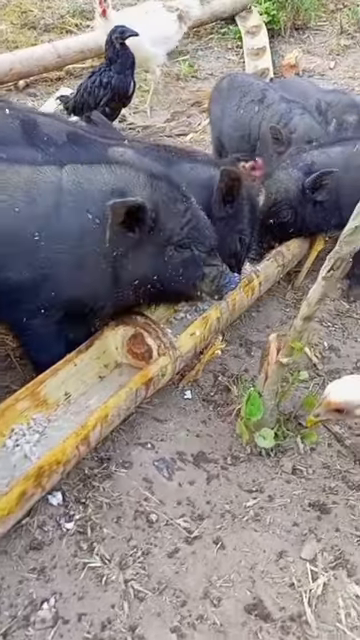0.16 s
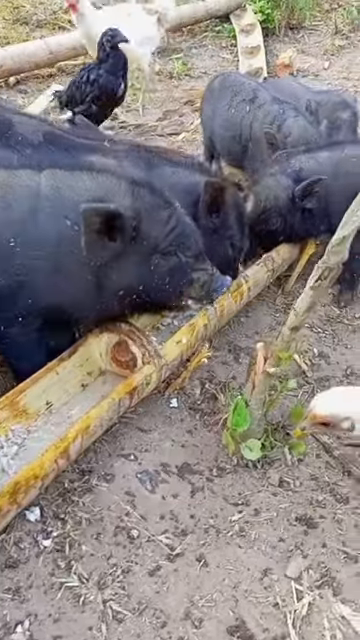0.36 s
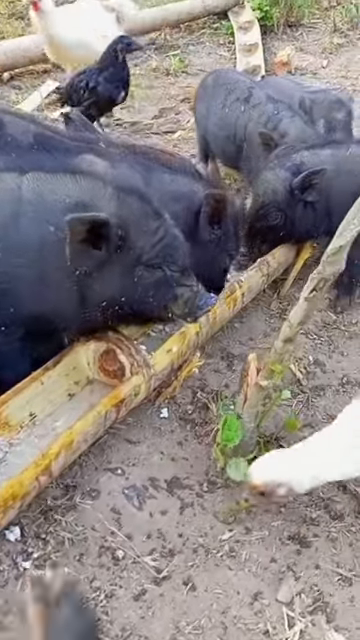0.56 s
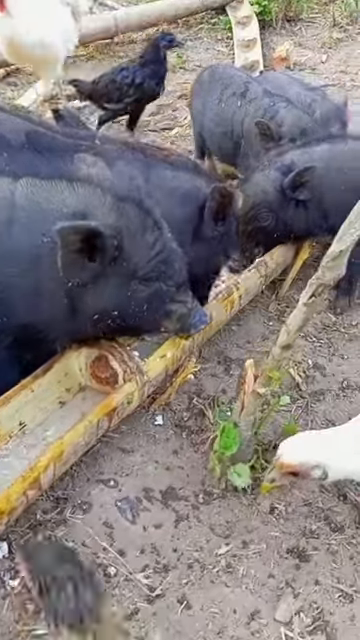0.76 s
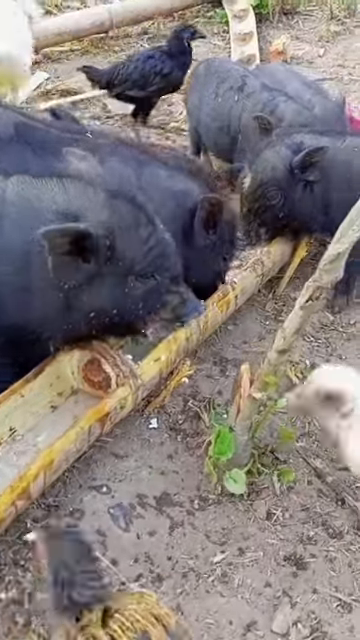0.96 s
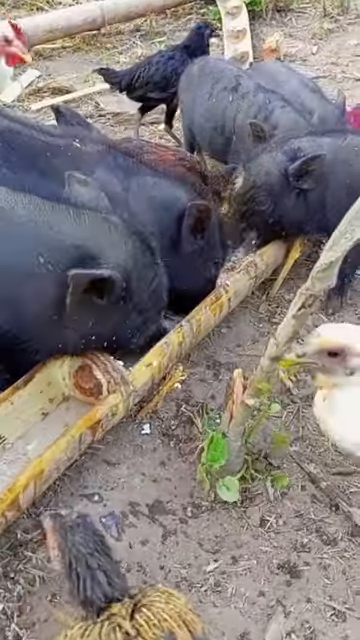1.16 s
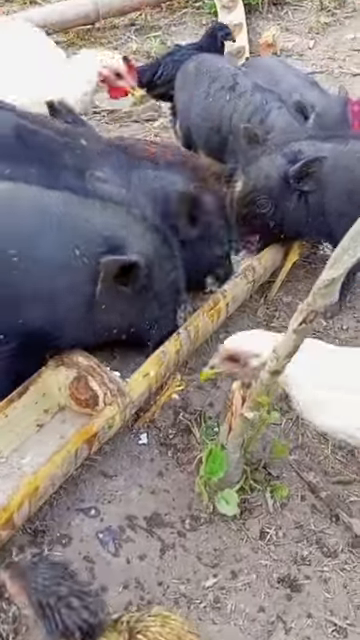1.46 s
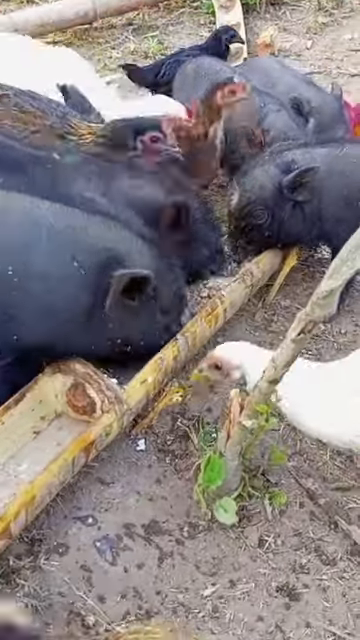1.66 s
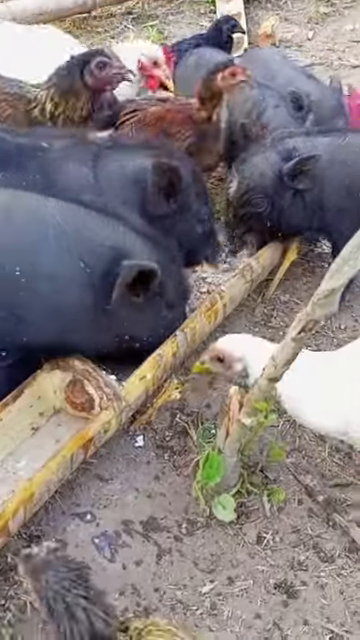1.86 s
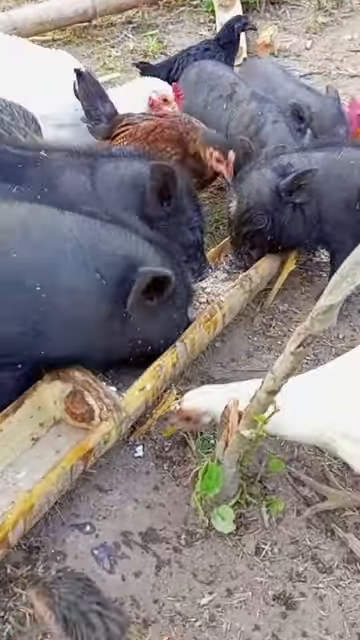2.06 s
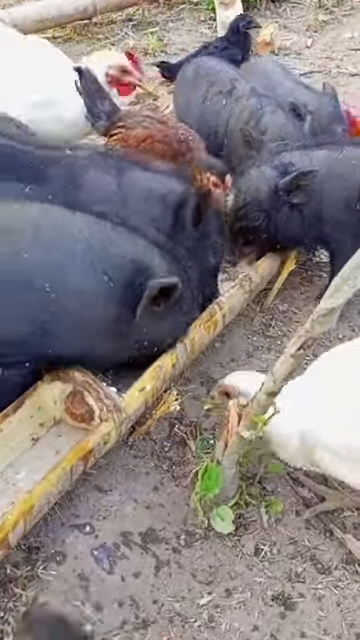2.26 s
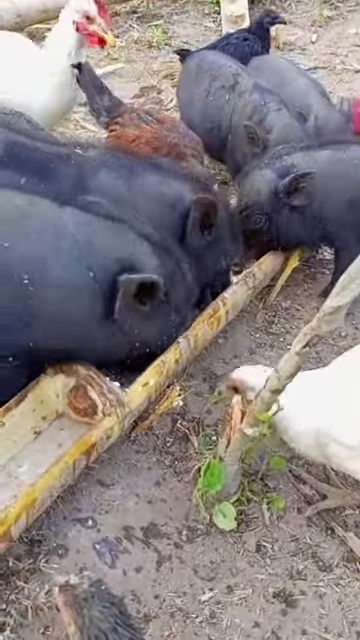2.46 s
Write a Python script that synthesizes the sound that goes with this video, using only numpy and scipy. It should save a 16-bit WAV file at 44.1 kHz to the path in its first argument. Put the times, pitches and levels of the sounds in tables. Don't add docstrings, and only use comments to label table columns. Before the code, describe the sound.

Wet, fast gobbling of pigs eating mash, bright lip smacks and slurps, faint grunts and squeaks

```python
import sys
import numpy as np
from scipy import signal
from scipy.io import wavfile
from scipy.ndimage import uniform_filter1d

SR = 44100
rng = np.random.default_rng(int(sys.argv[2]) if len(sys.argv) > 2 else 0)


def magnitude_from_level(level_db):
    exponent = np.asarray(level_db, float) / 20
    return 10 ** exponent


def to_wav(sig):
    pcm = np.clip(np.atleast_2d(sig), -1, 1) * 32767
    pcm = np.round(pcm).astype(np.int16)
    wavfile.write(sys.argv[1], SR, pcm.T)


N = 114660
MOUTH_LOW_HZ = 1230


def curve(table):
    a = np.array(table)
    return magnitude_from_level(np.interp(np.arange(N) / SR, a[:, 0], a[:, 1]))


def band(x, hz, width):
    hz = min(hz, 0.45 * SR)
    return signal.lfilter(*signal.iirpeak(hz, hz / width, fs=SR), x)


def above(x, hz):
    return signal.sosfilt(signal.butter(3, hz, "high", fs=SR, output="sos"), x)


def unit(x):
    return x / np.sqrt(np.mean(x ** 2))


def walk(rate):
    k = int(SR / rate)
    held = rng.standard_normal(400)[np.minimum(np.arange(N) // k, 399)]
    return 1.5 * uniform_filter1d(uniform_filter1d(held, k), k // 2)


def hold(start, length, edge):
    t = np.arange(N) / SR - start
    ramp = np.clip(np.minimum(t, length - t) / edge, 0, 1)
    return np.sin(np.pi / 2 * ramp) ** 2


def clusters(rows, count, length_s, cycles, spread, glide, scatter_db, peak_at):
    top_hz, lead_click_db = 14900, 5
    out, t = np.zeros(N + 2048), np.arange(2048) / SR
    lead = np.array([peak_at, 0.5, magnitude_from_level(lead_click_db), 0.5]).reshape(4, 1, 1)
    for start, db, hz in rows:
        clicks = np.concatenate([lead, rng.random((4, count, 1))], axis=1)
        when, pitch_a, size, pitch_b = clicks
        age = np.maximum(t - length_s * when, 0)
        f = np.minimum(hz * np.exp(spread * (pitch_a + pitch_b - 1)), top_hz)
        turn = f * age / cycles
        bend = 1 + glide * np.minimum(turn, 3)
        ring = np.sin(2 * np.pi * f * age * bend) * turn * np.exp(-2 * turn)
        swell = when / peak_at * np.exp(1 - when / peak_at)
        x = (ring * swell * size ** (scatter_db / 8)).sum(axis=0)
        i = int((start - 0.5 * peak_at * length_s) * SR)
        out[i:i + 2048] += magnitude_from_level(db) * x / np.abs(x).max()
    return out[:N]


def mash(colour, clicks_per_s, click_db, share, smear_s, flicker_db, swell_db, flicker_rate):
    a = np.array(colour)
    out, swell, puff = 0, walk(flicker_rate), np.hanning(int(smear_s * SR) + 3)

    def crackle():
        chance, size = rng.random((2, N))
        clicks = (chance < clicks_per_s / SR) * magnitude_from_level(-click_db * np.log(size + 0.04))
        return signal.fftconvolve(clicks, puff, "same")

    common = crackle()
    for hz in np.geomspace(a[0, 0], a[-1, 0], num=10):
        width = hz * np.log(a[-1, 0] / a[0, 0]) / 9
        gate = 1 + share * (common + crackle())
        x = band(gate * rng.standard_normal(N), hz, 2 * width)
        x = band(band(x, hz, width), hz, width)
        db = np.interp(np.log(hz), np.log(a[:, 0]), a[:, 1])
        db = db + swell_db * swell + flicker_db * walk(flicker_rate)
        out = out + magnitude_from_level(db) * x
    return unit(out)


def chewing():
    # time in seconds, level in dB.
    effort = [(0, -49), (.55, -51.5), (.8, -49), (1.3, -51.5), (1.7, -47), (1.86, -51), (2.3, -48.5),
              (2.6, -57.5)]
    # frequency in Hz, level in dB.
    colour = [(1500, -6.5), (2100, -3.5), (3100, 3), (5000, -7), (8200, -8.5), (10000, -1.5),
              (12500, -19.5), (15500, -21.5)]
    x = mash(colour, clicks_per_s=81, click_db=3.0, share=0.79, smear_s=0.0076,
             flicker_db=3.95, swell_db=4.4, flicker_rate=44.915)
    low_hz = 0.58 * MOUTH_LOW_HZ
    return curve(effort) * magnitude_from_level(-3) * above(above(x, low_hz), low_hz)


def sloshing():
    # time in seconds, level in dB.
    gusts = [(0, -78), (.11, -74), (.14, -63.5), (.22, -80), (.59, -87), (.63, -65.5), (.8, -60),
             (1.25, -61.5), (1.33, -83.5), (1.37, -68), (1.78, -60.5), (1.85, -86.5), (1.89, -56.5),
             (1.99, -87), (2.085, -80), (2.11, -56.5), (2.33, -70), (2.39, -72.5)]
    # frequency in Hz, level in dB.
    colour = [(220, -4), (500, -5), (900, -1.5), (1300, -7)]
    x = mash(colour, clicks_per_s=60, click_db=1.3, share=0.8, smear_s=0.006,
             flicker_db=2.4, swell_db=2.2, flicker_rate=40)
    return curve(gusts) * magnitude_from_level(2.5) * x


def shoving():
    # time in seconds, level in dB.
    push = [
        (0.0, -71),
        (0.27, -95),
        (0.45, -53.5),
        (0.53, -65),
        (2.6, -74.5),
    ]
    # frequency in Hz, level in dB.
    colour = [(35, -12), (80, -2), (140, 12), (220, 0.5)]
    x = mash(colour, clicks_per_s=11, click_db=1.6, share=0.13, smear_s=0.0091,
             flicker_db=3.2, swell_db=0.57, flicker_rate=12)
    return curve(push) * magnitude_from_level(-2.5) * x


def grunts():
    # start in seconds, length in seconds, level in dB, pitch in Hz, throat resonance in Hz.
    calls = [
        (0.445, .115, -60, 130, 250),
        (0.744, 0.09, -52, 120, 378),
        (1.172, 0.08, -55, 110, 405),
        (1.545, .115, -60, 78, 140),
        (0.73, 0.03, -56, 71, 200),
        (2.205, 0.08, -59, 90, 300),
        (0.002, .09, -62, 100, 250),
        (1.505, .14, -60, 78, 320),
    ]
    jitter, width = 0.13, 0.92
    out, t = 0, np.arange(N) / SR
    for start, length, db, hz, throat_hz in calls:
        phase = np.cumsum(hz * (1 + jitter * walk(60))) / SR
        x = np.diff(np.floor(phase), prepend=0) * magnitude_from_level(4.0 * rng.standard_normal(N))
        for _ in range(3):
            x = band(x, throat_hz, width * throat_hz)
        fade = magnitude_from_level(-80 * np.clip(t - start, 0, 1))
        out = out + magnitude_from_level(db) * unit(x) * hold(start, length, 0.0029) * fade
    return out


def smacks():
    # time in seconds, peak in dB, mouth resonance in Hz.
    lip_partings = [(0.03, -34.5, 3490), (0.0653, -39.5, 2950), (0.1144, -33.5, 2370),
                    (0.1341, -26.5, 3520), (0.3097, -34.5, 3480), (0.3577, -23.5, 3300),
                    (0.384, -37, 3100), (0.401, -41, 3000), (0.4346, -34.5, 3090), (0.4666, -27, 3160),
                    (0.5412, -41, 3100), (0.611, -34, 3000), (0.6234, -28, 2820), (0.6504, -32, 2800),
                    (0.6892, -35, 3060), (0.7432, -33.5, 3360), (0.7533, -24.5, 3370),
                    (0.7891, -22.5, 3290), (0.829, -30, 3000), (0.8354, -34, 3000), (0.8559, -32.5, 3470),
                    (0.9365, -31, 3500), (1.0081, -32.5, 3260), (1.024, -36.5, 2240), (1.0263, -28, 3395),
                    (1.05, -34, 3600), (1.0686, -35, 3160), (1.0779, -22, 3230), (1.09, -32, 2430),
                       (1.1386, -23, 3280), (1.142, -28.5, 3320), (1.3632, -37, 2570), (1.3745, -26, 3660),
                       (1.3804, -32, 2520), (1.455, -31, 2850), (1.4674, -28, 2960), (1.5237, -37, 2320),
                       (1.665, -29, 2610), (1.716, -27.5, 2870), (1.7543, -26.5, 2114), (1.9021, -26, 3180),
                       (1.9745, -33, 3720), (2.0888, -28.5, 2700), (2.0958, -25, 2580),
                       (2.105, -32.5, 3240), (2.2401, -32, 3050), (2.3095, -26, 2930),
                       (2.3139, -20.5, 3500), (2.3185, -21, 2830), (2.3319, -27.5, 3070),
                       (2.342, -36, 3380), (2.354, -36, 3970), (2.4006, -29, 3700), (2.432, -34, 2660),
                       (2.594, -33.5, 3060)]
    x = clusters(lip_partings, count=16, length_s=0.012, cycles=2.8,
                 spread=0.3, glide=0.005, scatter_db=9, peak_at=0.35)
    return above(x, MOUTH_LOW_HZ)


def bubbles():
    # time in seconds, peak in dB, pitch in Hz.
    rings = [(.039, -53.5, 1195), (.06, -53, 1150), (.47, -58.5, 1000), (1.264, -50.5, 1470),
             (1.278, -51.5, 840), (1.507, -56, 610), (1.583, -51.5, 1550), (1.63, -52.5, 1180),
             (1.755, -37, 1650), (1.882, -53.5, 550), (1.902, -45, 934), (2.32, -31, 917),
             (2.491, -51, 1430)]
    return clusters(rings, count=2, length_s=0.00617, cycles=6.36,
                    spread=0.11, glide=0.0072, scatter_db=8.5, peak_at=0.312)


def sprays():
    # time in seconds, peak in dB, centre in Hz.
    from_lips = [(0.3583, -34, 9300), (0.4374, -33, 6200), (0.4637, -30, 6830), (0.5945, -36, 6530),
                 (0.6148, -35.5, 9300), (0.623, -28.5, 6400), (0.7595, -29, 10900), (0.829, -24.5, 5800),
                 (0.8368, -25, 8420), (0.9727, -35, 6940), (1.1158, -36.5, 9500), (1.2306, -39, 10200),
                 (1.3685, -31, 8550), (1.4573, -32, 7580), (1.4654, -34, 5470), (1.7038, -35, 8630),
                 (1.7703, -25, 9250), (1.7782, -27, 6500), (1.9044, -30, 9130), (1.97, -32, 11000),
                 (2.0302, -38, 10000), (2.0949, -30.5, 5920), (2.3226, -30.5, 10170), (2.431, -33.5, 8030),
                 (0.0524, -41.5, 8200), (0.1165, -36.5, 5900), (0.2348, -44, 6890), (0.3126, -40.5, 5130),
               (1.0313, -39, 5900), (1.0777, -36, 10000), (1.1387, -37.5, 10000), (1.3678, -34, 9480),
               (1.486, -40.5, 9300), (1.5504, -56, 9500), (1.714, -45, 9300), (1.7982, -41, 9500),
               (1.9984, -41.5, 5450), (2.3394, -35, 9700), (2.4, -41, 5500), (2.5994, -21.5, 5000)]
    return clusters(from_lips, count=40, length_s=0.013, cycles=3.0,
                    spread=0.84, glide=0.027, scatter_db=9.5, peak_at=0.33)


def pops():
    # time in seconds, peak in dB, pitch in Hz.
    knocks = [(0.129, -42.5, 780), (0.143, -41.5, 1310), (0.426, -39.5, 364), (0.621, -31.5, 858),
              (0.696, -41.5, 1060), (0.764, -41.5, 369), (0.829, -36.5, 940), (1.068, -36, 900),
              (1.135, -41.5, 1300), (1.181, -45.5, 412), (1.367, -48, 667), (1.457, -49.5, 443),
              (1.729, -35, 1450), (1.74, -38.5, 1450), (1.876, -44.5, 1210), (2.105, -36.5, 960),
              (2.208, -43, 650), (2.326, -36.5, 730), (2.435, -44, 1230)]
    return clusters(knocks, count=7, length_s=0.01404, cycles=1.94,
                    spread=0.39, glide=0.01, scatter_db=1.0, peak_at=0.3088)


def splats():
    # time in seconds, peak in dB, centre in Hz.
    slaps = [(.232, -48, 1440), (.25, -53, 1570), (.359, -52, 1110), (.388, -50, 1480), (.627, -40.5, 1270),
             (.714, -47, 1120), (.745, -40, 1050), (.789, -39, 1250), (1.367, -40, 1720),
             (1.459, -43.5, 890), (1.468, -47, 1110), (1.654, -45.5, 980), (1.667, -42.5, 780),
             (1.78, -50, 1300), (1.947, -48, 1030), (1.97, -44, 1300), (2.03, -52.5, 1380),
             (2.212, -43.5, 1090), (2.517, -49.5, 1110)]
    x = clusters(slaps, count=12, length_s=0.01091, cycles=2.57,
                 spread=0.71, glide=0.023, scatter_db=-1.5, peak_at=0.3043)
    return above(x, 550)


def bumps():
    # time in seconds, peak in dB, pitch in Hz.
    blows = [
        (.424, -40, 254),
        (1.064, -55, 89),
        (1.775, -52, 198),
        (2.32, -54, 146),
        (2.52, -60.5, 201),
    ]
    return clusters(blows, count=3, length_s=0.0098, cycles=1.23,
                    spread=0.67, glide=0.001, scatter_db=1, peak_at=0.232)


def squeaks():
    # start in seconds, length in seconds, level in dB, pitch from in Hz, pitch to in Hz.
    notes_sung = [
        (0.905, 0.075, -55, 365, 400),
        (1.156, 0.03, -45, 680, 660),
        (1.352, 0.075, -57, 320, 345),
        (1.545, 0.115, -60, 78, 79),
        (0.858, .065, -60, 940, 915),
        (0.965, .085, -60, 330, 310),
    ]
    octave_db = -2.5
    out, t = 0, np.arange(N) / SR
    for start, length, db, from_hz, to_hz in notes_sung:
        hz = np.interp(t, [start, start + length], [from_hz, to_hz]) * (1 + 0.0123 * walk(90))
        phase = 2 * np.pi * np.cumsum(hz) / SR
        note = np.sin(phase) + magnitude_from_level(octave_db) * np.sin(2 * phase)
        fade = magnitude_from_level(-8 * np.clip((t - start) / length, 0, 1))
        out = out + magnitude_from_level(db + 1.6 * walk(120)) * note * hold(start, length, 0.14 * length) * fade
    return out


def sniffs():
    # start in seconds, length in seconds, level in dB, centre in Hz, width in Hz.
    breaths = [
        (1.565, 0.13, -55.5, 9800, 2880),
        (2.107, 0.1464, -50, 4740, 2640),
    ]
    out = 0
    for start, length, db, hz, width in breaths:
        hiss = unit(band(band(rng.standard_normal(N), hz, width), hz, width))
        out = out + magnitude_from_level(db + 2.3 * walk(49)) * hold(start, length, 0.013) * hiss
    return out


def far_call():
    # multiple of the pitch, level in dB.
    overtones = [(3, -79), (4, -75), (5, -69)]
    start_s, length_s, pitch_hz = 1.99, 0.62, 286
    phase = 2 * np.pi * np.cumsum(pitch_hz * (1 + 0.00355 * walk(15))) / SR
    note = sum(magnitude_from_level(db + 2.5 * walk(20)) * np.sin(k * phase) for k, db in overtones)
    return hold(start_s, length_s, 0.05) * note


def trough_tail(x):
    t60_s, tail_db = 0.16, -17
    t = np.arange(4096) / SR
    tail = rng.standard_normal(4096) * magnitude_from_level(-60 * t / t60_s)
    return magnitude_from_level(tail_db) * signal.fftconvolve(x, tail / np.sqrt(np.sum(tail ** 2)))[:N]


def scene():
    beds = chewing() + sloshing() + shoving()
    bright = smacks() + sprays()
    low = bubbles() + pops() + splats() + bumps()
    near = bright + low + trough_tail(bright + magnitude_from_level(-8) * low)
    voices = grunts() + squeaks() + sniffs() + far_call()
    return (near + voices + beds)[None]


def band_limit(x):
    return signal.sosfilt(signal.butter(12, 16120, fs=SR, output="sos"), x)


def record(dry):
    mic_low_hz, mic_rolloff_hz, top_hz = 42, 13850, 15700
    mute_s, mute_length_s, mute_edge_s, mute_db = 0.256, 0.052, 0.014, -31
    x = above(dry, mic_low_hz)
    x = signal.sosfilt(signal.butter(2, mic_rolloff_hz, fs=SR, output="sos"), x)
    x = signal.sosfilt(signal.ellip(10, 0.2, 80, top_hz, fs=SR, output="sos"), x)
    mix = x * magnitude_from_level(mute_db * hold(mute_s, mute_length_s, mute_edge_s))
    return band_limit(mix)


dry = scene()
out = record(dry)
to_wav(out)
```